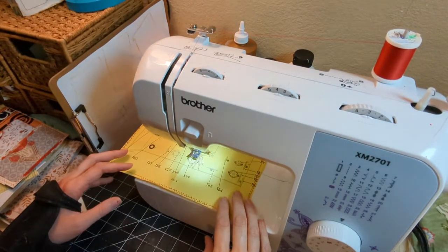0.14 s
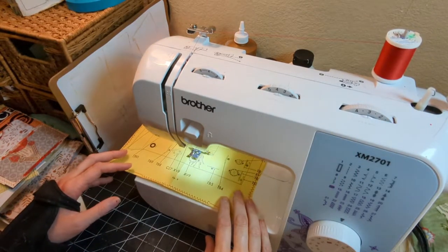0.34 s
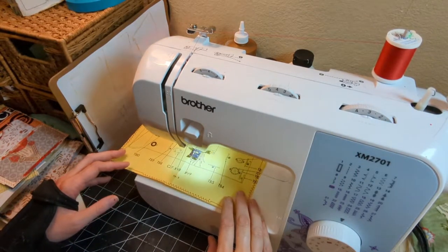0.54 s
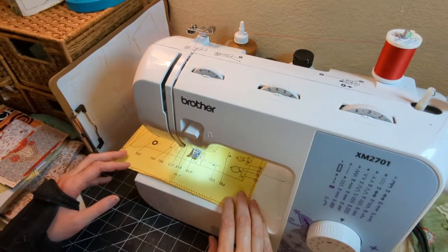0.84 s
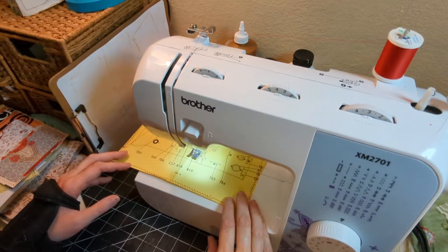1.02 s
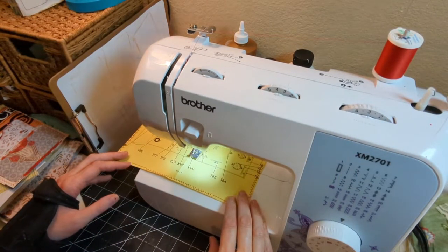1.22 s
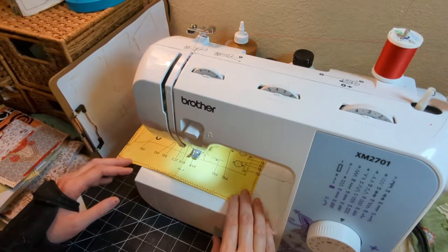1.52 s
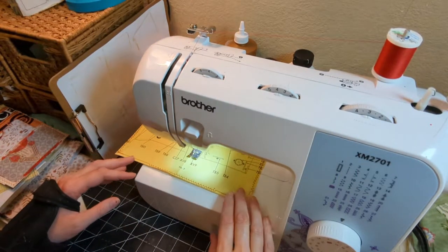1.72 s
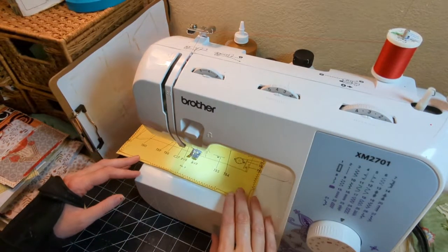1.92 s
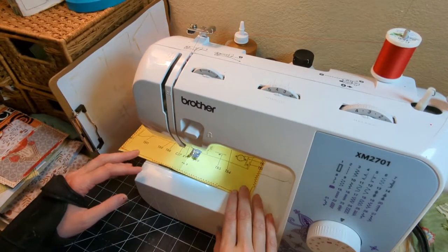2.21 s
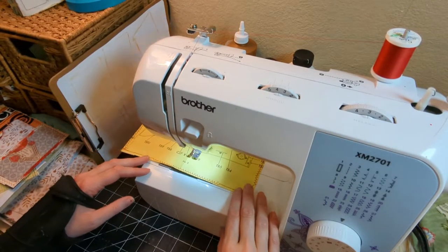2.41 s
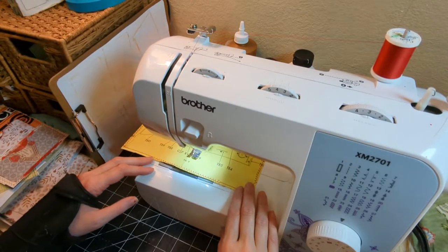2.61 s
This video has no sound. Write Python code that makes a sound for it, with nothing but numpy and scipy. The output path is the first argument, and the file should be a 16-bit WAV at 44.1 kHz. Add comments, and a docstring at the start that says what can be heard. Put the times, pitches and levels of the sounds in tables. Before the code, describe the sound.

Sewing machine running close by: even bright clicking, short gritty feed rasps and a thin motor hum.

```python
"""In a small room, an electric sewing machine stitches steadily, about five stitches a second, close by. Its
drive whines and sags under the load of the strokes: wavering sine tones that follow one speed. Shaped noise
makes the rumble and chatter of the gears in a plastic case, and a swish of thread. In every stitch the feed
rasps briefly (gritty noise), then the needle mechanism snaps with a bright metallic click (noise bursts and
ringing steel). Dull knocks of the case mostly land with the clicks, and one squeak comes in between."""
import sys
import numpy as np
from scipy import signal
from scipy.fft import rfft, irfft, next_fast_len
from scipy.io import wavfile
from scipy.ndimage import map_coordinates

SR = 44100
rng = np.random.default_rng(int(sys.argv[2]) if len(sys.argv) > 2 else 0)


def wav_record(signal):
    """Record a signal, one row per channel, as 16-bit PCM in the file named by sys.argv[1]."""
    frames = np.transpose(np.atleast_2d(signal))
    bounded = np.clip(frames, -1, 1)
    # unit amplitude maps onto the largest positive 16-bit level
    quanta = np.round(bounded * 32767).astype(np.int16)
    wavfile.write(sys.argv[1], SR, quanta)


N = 121275  # length in samples

# speed of the drive: (time [s], whine pitch [Hz])
WHINE_PITCH = [(0.0, 458), (0.02, 423.7), (0.05, 439), (0.12, 429), (0.19, 461.5), (0.21, 451), (0.25, 464),
               (0.31, 445.2), (0.38, 454), (0.42, 436.7), (0.45, 449.2), (0.52, 428.2), (0.57, 445.1),
               (0.62, 441.6), (0.66, 463.6), (0.67, 453), (0.73, 442.3), (0.77, 464), (0.81, 449.6),
               (0.84, 457.7), (0.91, 427.6), (0.96, 454.4), (1.01, 446.3), (1.04, 457.6), (1.1, 444.4),
               (1.15, 476), (1.17, 457), (1.21, 469.3), (1.23, 451.3), (1.27, 463.6), (1.29, 452),
               (1.33, 470), (1.37, 450), (1.41, 460), (1.49, 429.8), (1.54, 461.2), (1.56, 447),
               (1.6, 474.6), (1.68, 448.5), (1.73, 470.8), (1.75, 454), (1.79, 461), (1.87, 431.3),
               (1.92, 459.6), (1.94, 445.4), (1.99, 457.8), (2.05, 449), (2.16, 471.2), (2.25, 439.6),
               (2.31, 458.5), (2.32, 443.6), (2.39, 452.6), (2.45, 424.4), (2.5, 458.2), (2.52, 448.5),
               (2.56, 467.2), (2.64, 444.7), (2.69, 465.4), (2.72, 450.7), (2.75, 458)]
# loudness of the whine, before its flutter: (time [s], level [dB])
WHINE_LEVEL = [(0.0, -32), (0.02, -44.5), (0.05, -33.0), (0.08, -30.5), (0.13, -39.5), (0.17, -32.5),
               (0.24, -30.0), (0.25, -34.0), (0.32, -27.0), (0.33, -33.0), (0.4, -30), (0.43, -31),
               (0.46, -26), (0.51, -33), (0.52, -44), (0.6, -29), (0.61, -36.5), (0.63, -30.5),
               (0.7, -28.5), (0.77, -35), (0.79, -29.5), (0.85, -28.5), (0.88, -25.5), (0.92, -37),
               (1.02, -27), (1.11, -30), (1.17, -53), (1.18, -33.5), (1.25, -44), (1.27, -32),
               (1.31, -31.5), (1.34, -41.5), (1.36, -29), (1.4, -26.5), (1.42, -33), (1.46, -24.5),
               (1.49, -37), (1.58, -29), (1.6, -35.0), (1.68, -30.0), (1.72, -43.5), (1.74, -28),
               (1.79, -33), (1.83, -26), (1.85, -24.5), (1.86, -34), (1.92, -33), (1.94, -28), (2.03, -28),
               (2.1, -34.5), (2.11, -50), (2.13, -30.5), (2.16, -35.5), (2.23, -29.5), (2.3, -33),
               (2.38, -25.5), (2.43, -26.5), (2.45, -38), (2.52, -30), (2.55, -29.5), (2.57, -39.5),
               (2.58, -31), (2.6, -37), (2.62, -29.0), (2.67, -33), (2.69, -38.0), (2.74, -26.5),
               (2.75, -29)]
# weaker tones of the drive, before they waver:
# (multiple of the whine pitch, level at the start [dB], level at the end [dB], phase wander [rad])
WEAKER_TONES = [(.2, -61.5, -59, 1.02), (.52, -58.5, -55, 1.03), (.72, -50.5, -52.5, 1.34),
                (.87, -51.5, -51.5, 0.34), (1.35, -51, -54.5, 1.0), (1.5, -56, -60.5, 1.34),
                (1.73, -57.5, -54.5, 0.78), (2, -51, -58.5, 0.99)]
FLUTTER_DB, FLUTTER_RAD, FLUTTER_PER_S = .6, .05, 81
CASE_PAN_DB, LEFT_LEAD_S = 2, 0.00012  # drive and knocks: louder at the left, and earlier

# tone colour of the gears' rumble: (frequency [Hz], strength [dB])
RUMBLE_COLOUR = [(25, -49), (60, -16), (90, -17.5), (125, -9.5), (200, -6), (330, -1.5), (385, 3.5),
                 (450, 1), (560, -2.5), (700, -3), (950, -5), (1100, -18), (1500, -17.5), (3000, -96)]
# tone colour of the gears' chatter: (frequency [Hz], strength [dB])
CHATTER_COLOUR = [(500, 4), (1050, -2.5), (1210, 12), (1400, -4), (1700, 4.5), (1870, 7), (2110, 8),
                  (2600, 4), (3400, -1.5), (4200, -5), (5000, -7), (8000, -12), (10000, -10.5), (12500, -8),
                  (15000, -17), (16500, -27)]
# level of the chatter, before the lulls: (time [s], level [dB])
CHATTER_LOUDNESS = [(0, -48), (.9, -48), (1.3, -46.5), (1.95, -49), (2.15, -44.5), (2.35, -47.5),
                    (2.75, -47)]
RUMBLE_DB, RUMBLE_SWAY_DB, CHATTER_GRAIN_DB = -40, 1.1, 1
LULL_AFTER_S, LULL_WIDTH_S, LULL_DB = 0.073, 0.033, 1.5  # the linkage coasts after each click

# feed strokes, before the two feed gains below:
# (time [s], level [dB], extra treble [dB], length [s])
FEED_STROKES = [(0.052, -45.5, 2.5, 0.007), (0.073, -58, -3, 0.0063), (.245, -53.5, 0.5, 0.025),
                (0.441, -44, -3.5, 0.012), (0.648, -45, -3.5, 0.0092), (0.678, -54, -4, .004),
                (.827, -47.5, -0.5, 0.022), (1.029, -46.5, 2.5, 0.014), (1.052, -51.5, 6.5, 0.005),
                (1.219, -49, 4, 0.011), (1.244, -47.5, -2, 0.0079), (1.407, -48.5, 0, 0.028),
                (1.593, -47, -2.5, 0.021), (1.784, -44.5, -1.5, 0.019), (1.983, -47.5, 0, 0.026),
                (2.171, -48, 1, 0.018), (2.363, -43.5, -4.5, 0.023), (2.561, -42, 0, 0.023)]
# tone colour of the feed's body: (frequency [Hz], strength [dB])
FEED_BODY_COLOUR = [(500, -29), (1300, 0.5), (2600, 8.5), (3500, 1.5), (4300, 8), (5000, -12), (8000, -24)]
# tone colour of the feed's treble: (frequency [Hz], strength [dB])
FEED_TREBLE_COLOUR = [(3500, -26), (5300, 4), (7500, 1), (9500, 6), (12000, -0.5), (15000, 3), (16500, -30)]
FEED_BODY_DB, FEED_TREBLE_DB, FEED_ATTACK_S, FEED_T60_S = 3.5, 1, 0.0032, 0.066
FEED_GRAIN_DB, FEED_CLUMP_DB = 3.3, 2.5

# dull knocks of the case: (time [s], level [dB], pitch [Hz], time to die away by 60 dB [s])
CASE_KNOCKS = [(0.116, -36, 329, 0.33), (.51, -29, 336, 0.19), (0.716, -33.5, 337, 0.23),
               (1.859, -28, 309, 0.14), (1.866, -40, 157.4, 0.19), (2.05, -38.5, 197, 0.17),
               (2.246, -33.5, 194.7, 0.08), (2.385, -30.5, 318, 0.18), (2.441, -40, 166.9, 0.12)]
KNOCK_ATTACK_S, KNOCK_ROUGH_DB, KNOCK_ROUGH_PER_S = 0.011, -12, 303

# tone colour of the needle entering the cloth: (frequency [Hz], strength [dB])
CLOTH_COLOUR = [(300, 0), (1000, 11), (2100, 24.5), (3200, -13), (6000, 9.5)]
# the needle punches through the cloth just ahead of each click time
PUNCH_LEAD_S, PUNCH_WIDTH_S, PUNCH_DB, PUNCH_GRAIN_DB = 0.00063, 0.002, -40, 4

# needle clicks, before the delays and gains below:
# (time [s], level [dB], low band [dB], top band [dB], lingering tail [dB])
NEEDLE_CLICKS = [(0.12, -27.5, -18, -10, 4), (0.3183, -32, -6.5, 6, 3), (0.5117, -29.5, -11, -12.5, 5.5),
                 (0.7116, -33.5, -17, -14, 2), (.9102, -15, -20.5, -21.5, -4.5),
                 (1.0968, -18, -19, -18.5, -3.5), (1.293, -27.5, -11, -23, -2), (1.4803, -30.5, -7, -17, 1),
                 (1.6679, -26, -9, -11, .5), (1.8573, -21, -18, -16, 2), (2.0505, -19, -18, -10, -0.5),
                 (2.2459, -16, -14, -9, 1), (2.441, -24, -13.5, -13, -1.5), (2.6343, -26, -8.5, -13, 0.5)]
# tone colour shared by all clicks: (frequency [Hz], strength [dB])
SNAP_COLOUR = [(300, -9.5), (1500, -18.5), (2600, -7), (3500, -8.5), (4250, 0.5), (4700, -8.5), (5150, 1),
               (5700, -2.5), (6500, 3.5), (8100, -1.5), (9000, 7), (10200, 5), (11300, 4), (12400, 5),
               (13300, 0), (15000, 7), (16000, -15)]
# ringing of the steel parts, before a random change in each click:
# (pitch [Hz], level [dB], time to die away by 60 dB [s])
STEEL_RINGS = [(4250, -10, .03), (6520, -10, .04), (7040, -8, .045), (8790, 0, .04), (8960, 0, .04),
               (9450, -2, .04), (9860, 0, .04), (10280, -5, .04), (10760, -7, .04), (13200, -7, .035),
               (14950, -4, .035)]
# echoes off the bed and arm of the machine: (delay [s], gain [factor])
BED_ECHOES = [(.00112, 0.34), (.0019, 0.22), (.0041, 0.52)]
# how fast the room's sound dies: (frequency [Hz], time to die away by 60 dB [s])
ROOM_DECAY = [(300, 0.21), (3000, 0.099), (9000, 0.086), (16000, 0.061)]
CLICK_DB, CLICK_DELAY_S = 21, .0008
LOW_REF_DB, TOP_REF_DB, TINT_SHARE = -19, -10, .7  # band levels that add no tint; share of tint used
CRACK_T60_S, RATTLE_T60_S, RATTLE_DB, RING_DB = 0.0028, 0.036, 2, -9.5
CRACK_SPREAD, RATTLE_SPREAD = 0.7, 1.3  # how unlike each is at the two microphones
ROOM_DELAY_S, ROOM_DB = 0.009, -13

# thread swishing round the hook, before HOOK_DB: (time [s], level [dB], width [s])
HOOK_SWISHES = [(.21, -58, 0.014), (0.399, -48.5, 0.0054), (.591, -57.5, 0.0059), (0.797, -46.5, 0.011),
                (.995, -53, .012), (1.19, -56, .012), (1.379, -54, 0.011), (1.565, -59, .016),
                (1.755, -53.5, .014), (1.946, -56, 0.013), (2.128, -53, 0.012), (2.339, -45.5, 0.0099),
                (2.53, -51, 0.013), (2.725, -49.5, 0.014)]
# tone colour of the thread: (frequency [Hz], strength [dB])
THREAD_COLOUR = [(1500, -23), (4000, -9), (7500, -11), (9800, 2), (12000, -7), (13500, 1), (15000, -4),
                 (16500, -14)]
HOOK_DB = -2.5

# tone colour of the scrape: (frequency [Hz], strength [dB])
SCRAPE_TINT = [(300, -15), (600, 3.5), (1000, -4), (1900, -13.5), (3500, -33)]
SQUEAK_S, SQUEAK_WIDTH_S, SQUEAK_HZ, SQUEAK_ROUGH_RAD = 2.145, 0.0085, 975, 0.44
SQUEAK_DB, SCRAPE_DB = -37.5, -35

# stereo balance of the clicks: (frequency [Hz], left minus right [dB])
CLICK_SIDES = [(2000, 5), (3500, 2), (4200, -14), (5200, 2.5), (6500, 5.5), (8000, 7.5), (10000, 2),
               (12000, 2.5), (15000, 3.5)]
# stereo balance of the noises: (frequency [Hz], left minus right [dB])
NOISE_SIDES = [(60, 0), (110, 0.5), (200, -0.5), (380, 3.5), (700, 1), (1290, 0.5), (2380, 0), (4400, -2.5),
               (8120, 5), (15000, -1)]
# how alike the noises are at left and right: (frequency [Hz], likeness [1 = same, 0 = unrelated])
LIKENESS = [(60, 0.95), (130, 0.96), (290, 0.87), (640, 0.54), (1410, -0.061), (3100, -0.08), (6820, 0.075),
            (15000, 0.079)]
LOW_CUT_HZ, TOP_HZ = 35, 16500


def amp(db):
    """Decibels to gain."""
    return 10 ** (np.asarray(db) / 20)


def unit(x):
    """Scaled to an average strength (rms) of 1."""
    return x / np.sqrt(np.mean(x ** 2) + 1e-20)


def unit_energy(x):
    """Each channel scaled to energy 1."""
    return x / np.linalg.norm(x, axis=-1, keepdims=True)


def along(points, hz):
    """Values between (Hz, value) points, spaced as the ear hears pitch (log axis)."""
    f, v = np.transpose(points)
    return np.interp(np.log(hz + 1), np.log(f + 1), v)


def curve(rows):
    """(s, value) rows as one value per sample."""
    return np.interp(np.arange(N) / SR, *np.transpose(rows))


def wobble(rate):
    """A smooth random curve through this many random points a second."""
    return map_coordinates(rng.standard_normal(N // 8), [np.arange(N) * rate / SR], mode="wrap")


def swell(s, width):
    """A smooth rise and fall around a time."""
    return np.exp(-.5 * ((np.arange(N) / SR - s) / width) ** 2)


def filtered(x, response):
    """x with each frequency multiplied by a complex response."""
    m = next_fast_len(N + SR // 2)
    return irfft(rfft(x, m) * response(np.fft.rfftfreq(m, 1 / SR)), m)[..., :N]


def causal(db):
    """The filter response with these gains that never sounds ahead of its input."""
    c = irfft(np.log(amp(db)))
    half = c.shape[-1] // 2
    return np.exp(rfft(c * np.r_[1, np.full(half - 1, 2), 1, np.zeros(half - 1)]))


def pan(db):
    """Left and right gains for a level difference."""
    return amp(np.array([[.5], [-.5]]) * db)


def add(track, s, sound):
    """Mix a sound in at a time."""
    part = track[..., max(0, round(s * SR)):][..., :sound.shape[-1]]
    part += sound[..., :part.shape[-1]]


def noise(spectrum):
    """Coloured stereo noise of rms 1, near mono in the bass."""
    def mid_side(hz):
        turn = np.arccos(np.clip(along(LIKENESS, hz), -1, 1)) / 2
        return amp(along(spectrum, hz)) * [np.cos(turn), np.sin(turn)]

    mid, side = filtered(rng.standard_normal((2, N)), mid_side)
    stereo = np.array([mid + side, mid - side])
    return unit(filtered(stereo, lambda hz: pan(along(NOISE_SIDES, hz))))


def burst(t, t60):
    """A dying stereo burst of noise with an even spectrum."""
    z = rfft(rng.standard_normal((2, len(t))) * amp(-60 * t / t60))
    even = irfft(z / (np.abs(z) + 1e-12))
    return unit_energy(even * amp(-20 * t / t60))


def room_tail():
    """A fresh stereo tail of the room: fading noise whose treble dies first."""
    hz, t, z = signal.stft(rng.standard_normal((2, SR // 5)), SR, nperseg=256)
    fade = amp(-60 * t / along(ROOM_DECAY, hz)[:, None])
    build_up = 1 - np.exp(-t / 0.0022)
    return unit_energy(signal.istft(z * fade * build_up, SR, nperseg=256)[1])


def drive():
    """The fluttering whine of the drive and its weaker, wavering tones, all following one speed."""
    phase = 2 * np.pi * np.cumsum(curve(WHINE_PITCH)) / SR
    level = amp(curve(WHINE_LEVEL) + FLUTTER_DB * wobble(FLUTTER_PER_S))
    tone = level * np.sin(phase + FLUTTER_RAD * wobble(FLUTTER_PER_S))
    for multiple, first_db, last_db, wander in WEAKER_TONES:
        level = amp(np.linspace(first_db, last_db, N) + 2.8 * wobble(18))
        tone = tone + level * np.sin(multiple * phase + wander * wobble(22))
    return np.sqrt(2) * tone * pan(CASE_PAN_DB)


def gears():
    """Low rumble of the case and grainy chatter of the linkage, which eases off after every click."""
    rumble = unit(noise(RUMBLE_COLOUR) * amp(RUMBLE_SWAY_DB * wobble(40.21)))
    grain = amp(CHATTER_GRAIN_DB * wobble(500) + 1.8 * wobble(50.1))
    chatter = unit(noise(CHATTER_COLOUR) * grain)
    lull = sum(swell(s + LULL_AFTER_S, LULL_WIDTH_S) for s, *_ in NEEDLE_CLICKS)
    return amp(RUMBLE_DB) * rumble + amp(curve(CHATTER_LOUDNESS) - LULL_DB * lull) * chatter


def feed():
    """A short gritty rasp ahead of every click, its grains bunched in clumps."""
    t, body, treble = np.arange(N) / SR, np.zeros(N), np.zeros(N)
    grit = amp(FEED_GRAIN_DB * wobble(1100) + FEED_CLUMP_DB * wobble(190))
    for s, db, treble_db, length in FEED_STROKES:
        attack = np.clip((t - s) / FEED_ATTACK_S, 0, 1)
        shape = attack * amp(db - 60 * np.maximum(t - s - length, 0) / FEED_T60_S)
        stroke = np.linalg.norm(shape) * unit_energy(shape * grit)  # grit leaves the energy as it was
        body += amp(FEED_BODY_DB) * stroke
        treble += amp(FEED_TREBLE_DB + treble_db) * stroke
    return body * noise(FEED_BODY_COLOUR) + treble * noise(FEED_TREBLE_COLOUR)


def knocks():
    """Now and then the case gives a dull, rough, briefly ringing knock: a fading, roughened tone."""
    t, out = np.arange(SR // 4) / SR, np.zeros(N)
    for s, db, hz, t60 in CASE_KNOCKS:
        wander = wobble(KNOCK_ROUGH_PER_S) + 1j * wobble(KNOCK_ROUGH_PER_S)
        rough = amp(KNOCK_ROUGH_DB) * wander[:len(t)]
        ring = np.imag((1 + rough) * np.exp(2j * np.pi * hz * t))
        shape = amp(db - 60 * t / t60) * (1 - np.exp(-t / KNOCK_ATTACK_S))
        add(out, s, shape * unit(ring) / np.sqrt(2))
    return out * pan(CASE_PAN_DB)


def punch():
    """The dull prick of the needle entering the cloth: a tiny swell of grainy noise."""
    pricks = sum(swell(s - PUNCH_LEAD_S, PUNCH_WIDTH_S) for s, *_ in NEEDLE_CLICKS)
    return amp(PUNCH_DB) * pricks * unit(noise(CLOTH_COLOUR) * amp(PUNCH_GRAIN_DB * wobble(580)))


def steel(t):
    """Ringing steel: fading sine tones whose strengths differ from click to click."""
    ring = 0
    for hz, db, t60 in STEEL_RINGS:
        level = amp(db + rng.normal(0, 8.9) - 60 * t / t60)
        ring = ring + level * np.sin(2 * np.pi * hz * t + rng.normal(0, .8, (2, 1)))
    return unit_energy(ring)


def needle():
    """One snap a stitch: a crack with close echoes, a dense rattle and ringing steel, then the room."""
    size = 4096  # samples in one snap
    t, hz, out = np.arange(size) / SR, np.fft.rfftfreq(size, 1 / SR), np.zeros((2, N))
    ears = causal(20 * np.log10(pan(along(CLICK_SIDES, hz))))
    for s, db, low_db, top_db, tail_db in NEEDLE_CLICKS:
        # one burst shared by both sides, plus one that differs between them
        crack = unit_energy(burst(t, CRACK_T60_S)[0] + CRACK_SPREAD * burst(t, CRACK_T60_S))
        rattle = unit_energy(burst(t, RATTLE_T60_S)[0] + RATTLE_SPREAD * burst(t, RATTLE_T60_S))
        snap = crack + amp(RATTLE_DB) * rattle + amp(RING_DB) * steel(t)
        for delay, gain in BED_ECHOES:
            add(snap, delay, gain * crack)
        tint = [(4500, low_db - LOW_REF_DB), (8500, 0), (13500, top_db - TOP_REF_DB)]
        colour = along(SNAP_COLOUR, hz) + TINT_SHARE * along(tint, hz)
        snap = amp(db + CLICK_DB) * unit_energy(irfft(rfft(snap) * causal(colour)))
        add(out, s + CLICK_DELAY_S, irfft(rfft(snap) * ears))
        tail = amp(ROOM_DB + tail_db) * signal.fftconvolve(snap, room_tail(), axes=1)
        add(out, s + CLICK_DELAY_S + ROOM_DELAY_S, tail)
    return out


def hook():
    """A faint swish of thread between the clicks: swells of grainy noise."""
    swishes = sum(amp(db + HOOK_DB) * swell(s, width) for s, db, width in HOOK_SWISHES)
    return swishes * unit(noise(THREAD_COLOUR) * amp(2.2 * wobble(600)))


def squeak():
    """One short, rough squeak of a rubbing part (an unsteady tone), with a noisy scrape."""
    t = np.arange(N) / SR
    tone = np.sqrt(2) * np.sin(2 * np.pi * SQUEAK_HZ * t + SQUEAK_ROUGH_RAD * wobble(220))
    scrape = noise(SCRAPE_TINT)
    return swell(SQUEAK_S, SQUEAK_WIDTH_S) * (amp(SQUEAK_DB) * tone + amp(SCRAPE_DB) * scrape)


def scene():
    """The whole machine; its drive and knocks reach the left microphone first."""
    lead = lambda hz: np.exp(np.array([[1j], [-1j]]) * np.pi * hz * LEFT_LEAD_S)
    case = filtered(drive() + knocks(), lead)
    return case + gears() + feed() + punch() + needle() + hook() + squeak()


def record(dry):
    """The recorder cuts the deepest bass and keeps almost nothing above its band limit."""
    def response(hz):
        bass_cut = hz ** 2 / np.sqrt(hz ** 4 + LOW_CUT_HZ ** 4)
        return bass_cut / np.sqrt(1 + (hz / TOP_HZ) ** 200)

    return filtered(dry, response)


dry = scene()
out = record(dry)
wav_record(out)
```